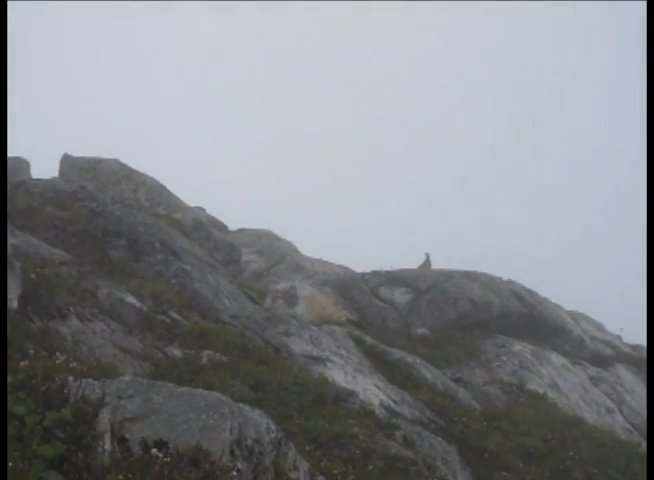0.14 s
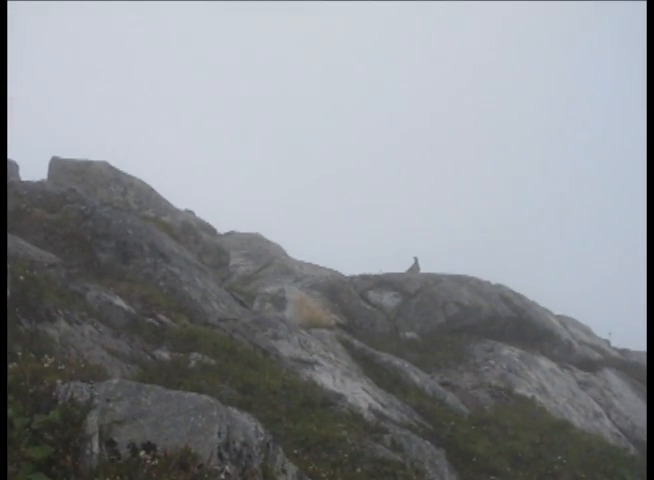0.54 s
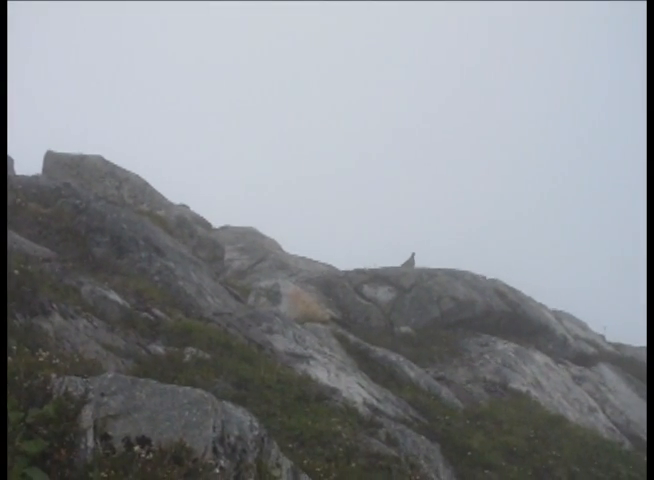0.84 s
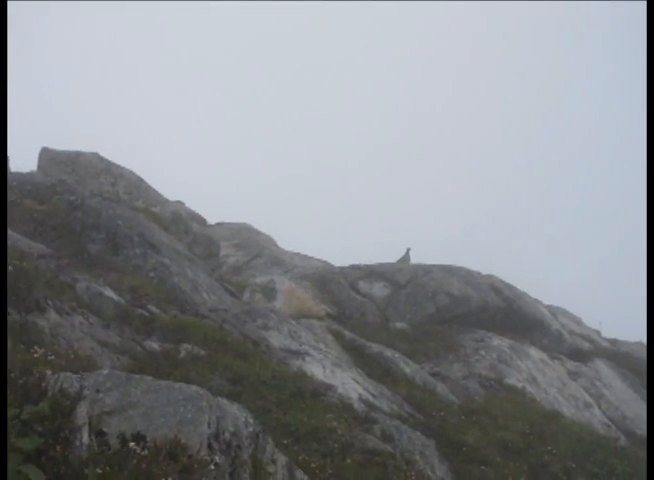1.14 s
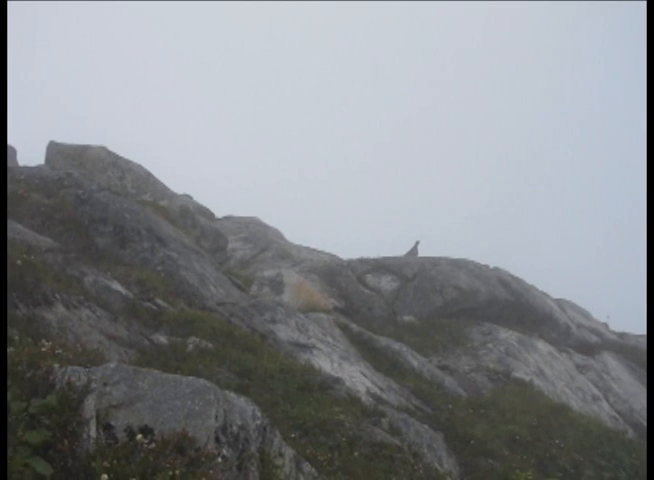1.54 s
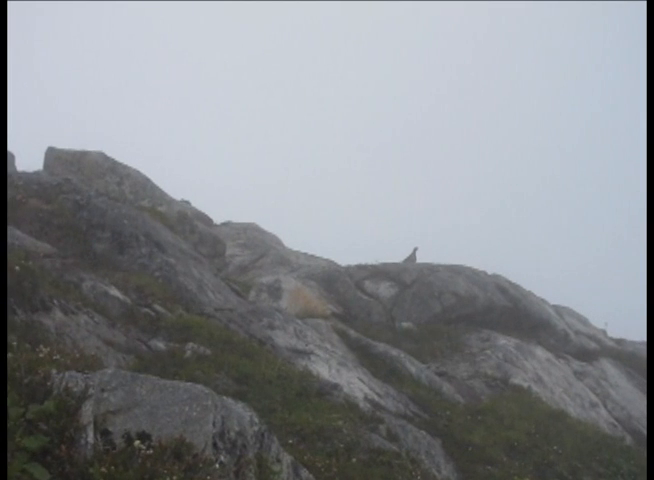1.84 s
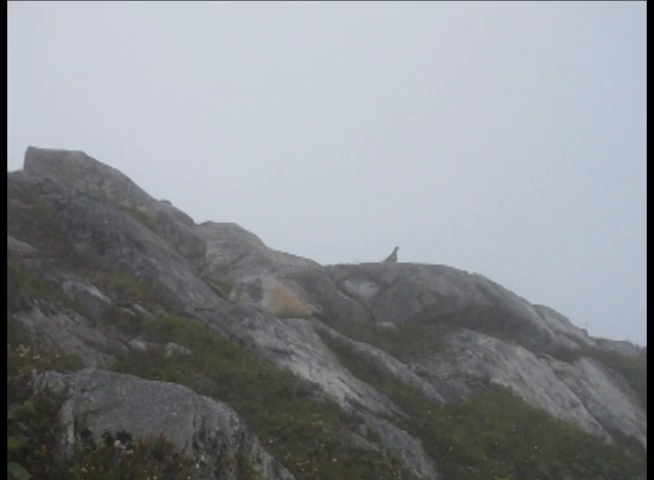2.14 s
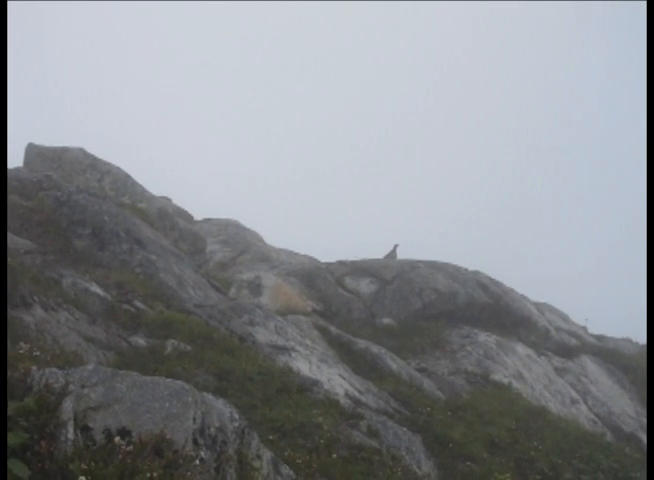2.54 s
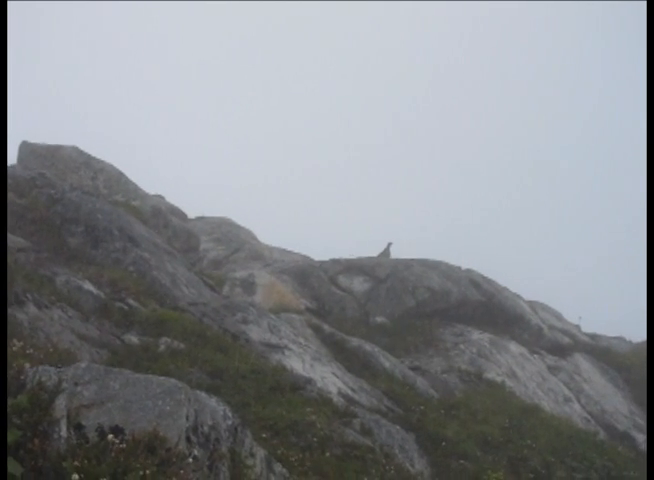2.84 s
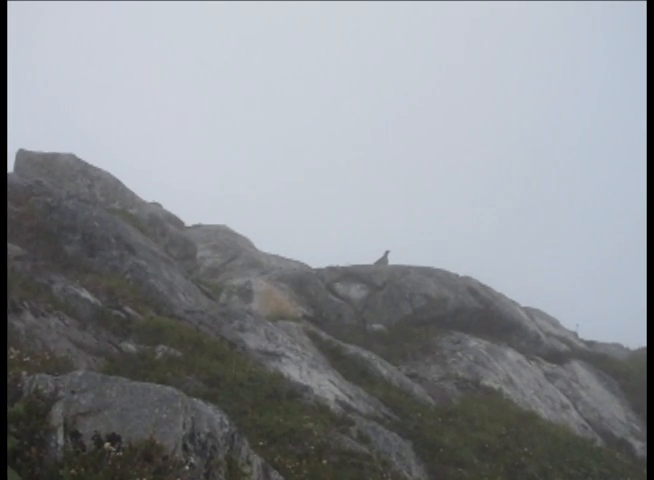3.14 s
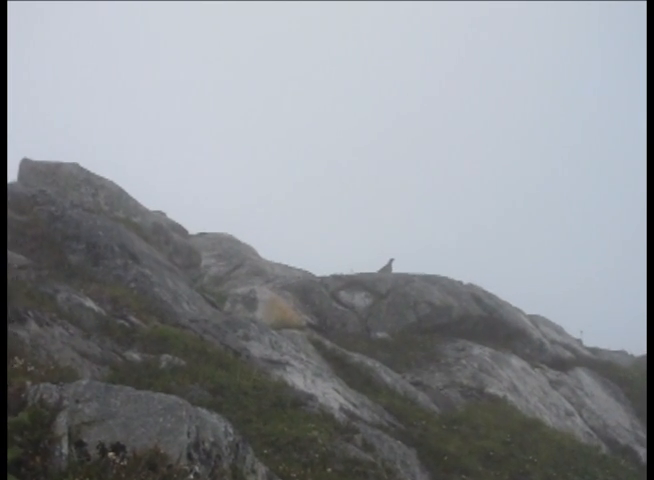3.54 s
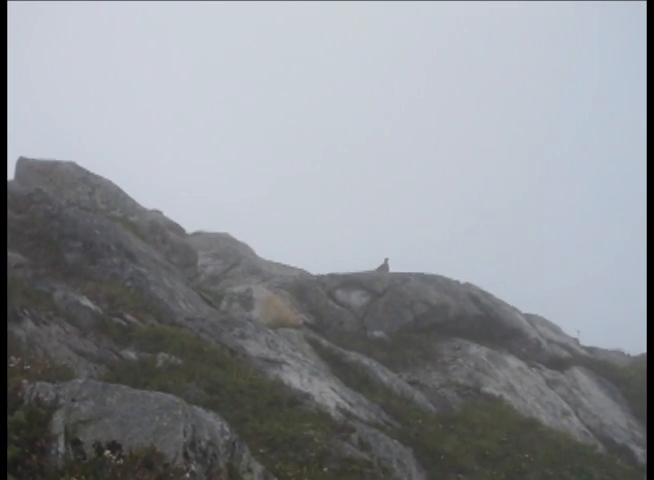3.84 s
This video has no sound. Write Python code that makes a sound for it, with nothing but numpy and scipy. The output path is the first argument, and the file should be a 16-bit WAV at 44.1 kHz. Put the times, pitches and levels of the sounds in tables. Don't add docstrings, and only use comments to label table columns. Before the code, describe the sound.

A grouse gives three separate short clucks, each a fast roll of hollow knocks with faint rock echoes. Soft wind roar and hiss continue outdoors, while gusts thump the small camera microphone hardest near the end.

```python
import sys
import numpy as np
from scipy import signal
from scipy.io import wavfile
from scipy.ndimage import uniform_filter1d

SR = 44100
rng = np.random.default_rng(int(sys.argv[2]) if len(sys.argv) > 2 else 0)


def log_audio(samples):
    frames = np.atleast_2d(samples).T
    limited = np.clip(frames, -1, 1)
    pcm = np.round(limited * 32767).astype(np.int16)
    wavfile.write(sys.argv[1], SR, pcm)


def gain_from_db(level_db):
    decades = np.asarray(level_db, float) / 20
    return 10 ** decades


N = 176400

# pitch_hz, level_db (per Hz)
ROAR_SPECTRUM = [(35, -23), (60, -3.5), (291, -14.5), (394, -10.5), (1070, -23.5), (1260, -24),
                 (2200, -30.5), (9970, -41), (15500, -48)]
# pitch_hz, level_db
WHINE_TONES = [(10045, -97), (14788, -100)]
# start_s, level_db, pitch_hz
HOUSING_TICKS = [
    (1.3, -55, 4200),
    (1.6845, -46, 2600),
]
GUST_PEAKS = [.136, .225, .272, .492, .673, .775, .842, 1.493, 1.719, 1.786, 2.433, 2.558, 2.655, 2.897,
              2.961, 3.03, 3.085, 3.123, 3.19, 3.393, 3.454, 3.503, 3.54, 3.598, 3.672, 3.758, 3.796, 3.833,
              3.873, 3.943]
# force_db, length_s, air_speed_m_per_s
GUST_FORCES = [(-25.5, 0.02, 1.4), (-25.5, 0.047, 2.66), (-22.5, 0.015, 4.45), (-24, 0.013, 1.26),
               (-23, 0.0045, 1.34), (-30, 0.031, 0.6), (-35, 0.011, 2.1), (-41, 0.0097, 1.6),
               (-26, 0.0069, 1.1), (-28, 0.024, 0.85), (-31.5, 0.047, 0.57), (-32, 0.0068, 0.57),
               (-27.5, .014, 2), (-28.5, 0.023, 3.8), (-29, 0.023, 3.3), (-22, 0.021, 4.9),
               (-20, 0.017, 2.36), (-29, 0.0079, 4.5), (-28, .024, 1.96), (-31.5, .012, 2.5),
               (-17.5, 0.014, 3.4), (-16.5, 0.023, 6.5), (-17, 0.0077, 4.3), (-17.5, 0.018, 6.1),
               (-10.5, 0.013, 8.36), (-14, 0.016, 13.7), (-16, 0.0098, 13.7), (-13.5, 0.013, 9.5),
               (-14, 0.0042, 12.3), (-19.5, 0.043, 3.9)]
# time_s, force_db
BREEZE_FORCE = [(0.0, -33), (0.24, -28.5), (0.52, -35), (0.65, -33.5), (1.45, -37.5), (1.7, -32),
                (1.92, -36), (2.22, -35), (2.38, -40), (2.54, -33), (2.95, -25), (3.06, -31), (3.21, -27.5),
                (3.44, -25.5), (3.6, -22.5), (3.74, -12.5), (3.9, -32), (4.0, -25)]
# loudest_knock_s, knock_period_ms, fastest_offset_knocks, effort_peak_offset_knocks
CLUCK_ROLLS = [
    (.24855, 6.2, .5, .3),
    (1.56857, 6.58, 0.1, -.4),
    (3.2091, 6.97, .6, 0.0),
]
CLUCK_TUNING = [(1.04, 1.025), (.995, 1.0), (1.02, 1.085)]
# level_db, chest_db, mouth_db, snap_db
CLUCK_VOICES = [
    (-31, 8, 5, 7),
    (-29.5, 6.2, 2.9, 0.1),
    (-34.5, 9, -2, -3),
]
# pitch_hz, level_db, t60_s
CHEST_RING = (1090, -8, .02)
# pitch_hz, level_db, t60_s
THROAT_RINGS = [(1560, 0, .026), (1700, -13, .03), (1350, -11, .016)]
# pitch_hz, level_db, t60_s
MOUTH_RINGS = [(3300, -10, .018), (4550, -19, .015)]
# pitch_hz, level_db, t60_s
SNAP_RINGS = [(6000, -26, .006), (5200, -20, .0015), (8000, -30, .002)]
# delay_s, level_db
ROCK_ECHOES = [(.012, -26), (.029, -25), (.041, -22)]

ROAR_DB = -47.5
WHIRR_S, WHIRR_LEN_S, WHIRR_HZ, WHIRR_WIDE_HZ, WHIRR_DB = 0.19, 0.044, 10450, 900, -83
EDDIES_PER_S, EDDY_SPREAD_DB = 140, 2.2
BLUR = 0.7
CORE = 2.2
LULL_DB = -5
BREEZE_SPEED = 1.005
REACH_HZ_PER_SPEED, FALL, TILT = 30.24, 1.24, 0.52
LOW_CUT_HZ = 20.6
DRAG, DRAG_POWER, SAG = 0.011, 2.6, 0.008
SWELL_DB, DULL_DB = -2.2, -1.1
ONSET_S, THIN_HZ = 0.00012, 726
CREST = 30
DUCK_DB, DUCK_SHARE, RECOVER_DB_S = -20, 0.33, 2.0
EDGE_HZ = 15760


def evened(x):
    return x / np.sqrt(np.mean(x ** 2) + 1e-20)


def add(mix, s, sound):
    part = mix[round(s * SR):][:len(sound)]
    part += sound[:len(part)]


def ring(hz, db, t60, rise_s):
    t = (np.arange(2000) - CREST) / SR
    decay = gain_from_db(db - 60 * np.maximum(t, 0) / t60)
    rise = np.exp(-0.5 * (np.minimum(t, 0) / rise_s) ** 2)
    return decay * np.cos(2 * np.pi * hz * t) * rise


def roar():
    frames, hz = N // 256 + 5, np.fft.rfftfreq(1024, 1 / SR)
    a, b, c, d, patches = rng.standard_normal((frames, 513, 5)).T
    patches = uniform_filter1d(patches, size=12, axis=0)
    patches = evened(uniform_filter1d(patches, size=14, axis=1))
    f, level = np.transpose(ROAR_SPECTRUM)
    curve_db = np.interp(np.log(hz + 1), np.log(f + 1), level)[:, None]
    wind = (a + 1j * b) * gain_from_db(curve_db + 0.69 * patches)
    t = np.arange(frames) * 256 / SR
    from_beat = (t - WHIRR_S + 0.5) % 1 - 0.5
    beat = np.exp(-0.5 * (from_beat / WHIRR_LEN_S) ** 2)
    band = np.exp(-((hz[:, None] - WHIRR_HZ) / WHIRR_WIDE_HZ) ** 2)
    whirr = (c + 1j * d) * band * beat
    wind, whirr = signal.istft(np.array([wind, whirr]), nperseg=1024, noverlap=768)[1][:, :N]
    return gain_from_db(ROAR_DB) * evened(wind) + gain_from_db(WHIRR_DB) * evened(whirr)


def camera():
    t = np.arange(N) / SR
    out = sum(np.sqrt(2) * gain_from_db(db) * np.sin(2 * np.pi * hz * t) for hz, db in WHINE_TONES)
    for s, db, hz in HOUSING_TICKS:
        add(out, s, ring(hz, db, 0.008, 0.0005))
    return out


def wind_force(t):
    peak_s = np.array(GUST_PEAKS)[:, None]
    db, length, _ = np.transpose(GUST_FORCES)[:, :, None]
    strong = gain_from_db(2 * db) * np.exp(-0.5 * ((t - peak_s) / length) ** 2)
    calm = gain_from_db(2 * (LULL_DB + np.interp(t, *np.transpose(BREEZE_FORCE))))
    return strong, calm


def eddies():
    step = round(SR / EDDIES_PER_S)
    draw = rng.random((2000, 3))[:N // step - 1]
    at = ((np.arange(len(draw)) + draw[:, 0]) * step).astype(int)
    height = gain_from_db(EDDY_SPREAD_DB * -np.log(draw[:, 2] + 0.02))
    train = np.zeros(N)
    train[at] = np.sign(draw[:, 1] - 0.42) * height
    train[(np.array(GUST_PEAKS) * SR).astype(int)] += CORE
    return evened(train) + BLUR * rng.standard_normal(N)


def gusts():
    slow = signal.decimate(eddies(), 8, ftype="fir")
    hz, t, z = signal.stft(slow, SR / 8, nperseg=128, noverlap=112)
    speed = np.transpose(GUST_FORCES)[2][:, None]
    strong, calm = wind_force(t)
    mean_speed = ((strong * speed).sum(0) + calm * BREEZE_SPEED) / (strong.sum(0) + calm)
    reach_hz = REACH_HZ_PER_SPEED * np.maximum(mean_speed, 0.5)
    shape = np.exp(-(hz[:, None] / reach_hz) ** FALL) / (hz[:, None] + 130) ** TILT
    push = signal.istft(z * shape, SR / 8, nperseg=128, noverlap=112)[1]
    push = signal.resample_poly(push, 8, 1, window=("kaiser", 10))[:N]
    push = signal.sosfilt(signal.butter(2, LOW_CUT_HZ, "high", fs=SR, output="sos"), push)
    power = uniform_filter1d(uniform_filter1d(push ** 2, size=1500), size=900)
    push = push / np.sqrt(abs(power) + 1e-12)
    coarse = np.arange(0, N / SR + 0.01, 0.002)
    strong, calm = wind_force(coarse)
    return push * np.interp(np.arange(N) / SR, coarse, np.sqrt(strong.sum(0) + calm))


def knock(u, jitter, low, high, chest_db, mouth_db, snap_db):
    throat_scale = low * jitter[0] * (1 - SAG * u)
    throat = sum(ring(hz * throat_scale, db, t60, ONSET_S) for hz, db, t60 in THROAT_RINGS)
    hz, db, t60 = CHEST_RING
    chest = ring(hz * low * jitter[1], db + chest_db - DULL_DB * u / 2, t60, ONSET_S)
    mouth = sum(ring(hz * high * jitter[2], db, t60, ONSET_S) for hz, db, t60 in MOUTH_RINGS)
    snap = sum(ring(hz, db, t60, ONSET_S / 2) for hz, db, t60 in SNAP_RINGS)
    return throat - chest + gain_from_db(mouth_db + DULL_DB * u) * mouth + gain_from_db(snap_db + DULL_DB * u) * snap


def grouse():
    out = np.zeros(N)
    k = np.arange(-4, 5)
    for roll, (low, high), (db, *balance) in zip(CLUCK_ROLLS, CLUCK_TUNING, CLUCK_VOICES):
        at, period_ms, shift, peak = roll
        gaps = period_ms / 1000 * (1 + DRAG * abs(k + 0.5 - shift) ** DRAG_POWER)
        times = np.cumsum(gaps) - gaps
        starts = at + times - times[k == 0]
        jitters = 1 + 0.014 * rng.standard_normal((len(k), 3))
        for s, u, jitter in zip(starts, (k - peak) ** 2, jitters):
            sound = knock(u, jitter, low, high, *balance)
            add(out, s - CREST / SR, gain_from_db(db + SWELL_DB * u) * sound)
    for delay, db in ROCK_ECHOES:
        add(out, delay, gain_from_db(db) * out.copy())
    return signal.sosfiltfilt(signal.butter(3, THIN_HZ, "high", fs=SR, output="sos"), out)


def scene():
    return (grouse() + gusts() + roar() + camera())[None]


def band_limit(x):
    return signal.sosfilt(signal.butter(12, 15710, fs=SR, output="sos"), x)


def record(dry):
    power_db = 10 * np.log10(abs(uniform_filter1d(dry[0] ** 2, size=900)) + 1e-12)
    fall = np.arange(N) * RECOVER_DB_S / SR
    held_db = np.maximum.accumulate(power_db + fall) - fall
    over_db = np.maximum(held_db - DUCK_DB, 0)
    ducked = dry / gain_from_db(DUCK_SHARE * uniform_filter1d(over_db, size=600))
    edge = signal.firwin(801, EDGE_HZ, window=("kaiser", 9), fs=SR)
    return band_limit(signal.oaconvolve(ducked, edge[None], "same"))


dry = scene()
out = record(dry)
log_audio(out)
```